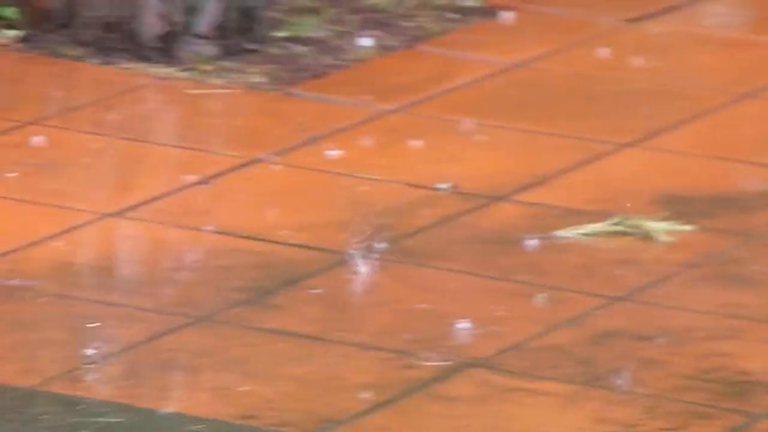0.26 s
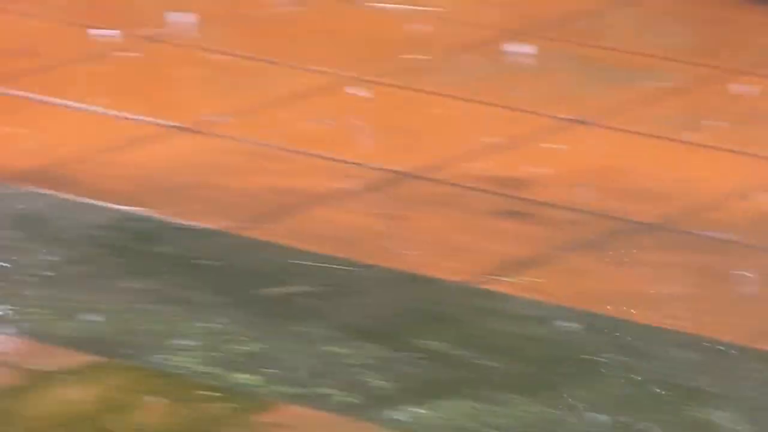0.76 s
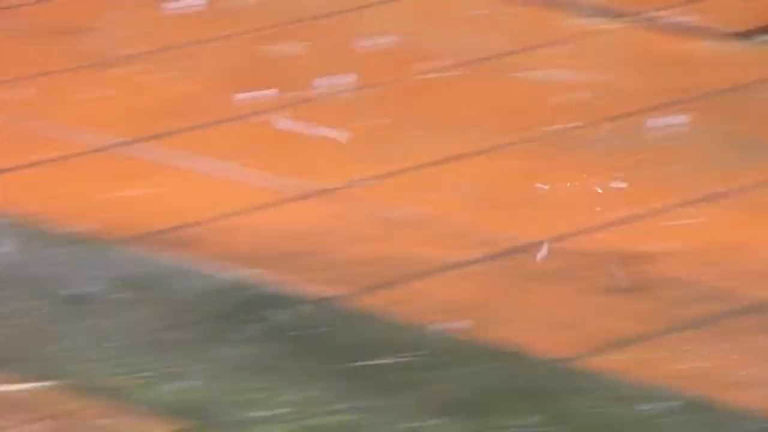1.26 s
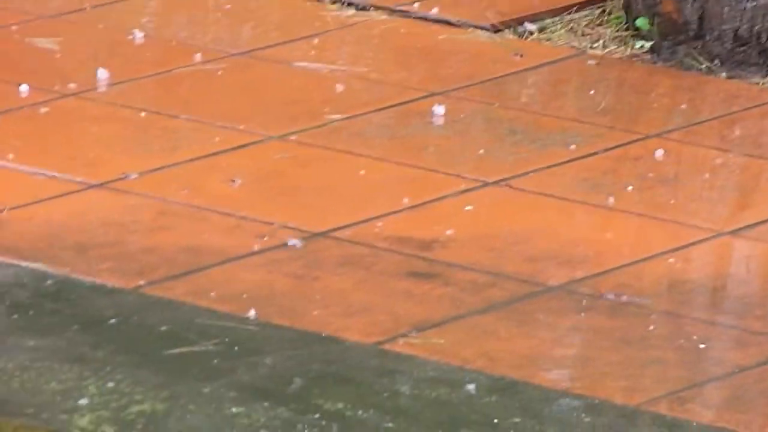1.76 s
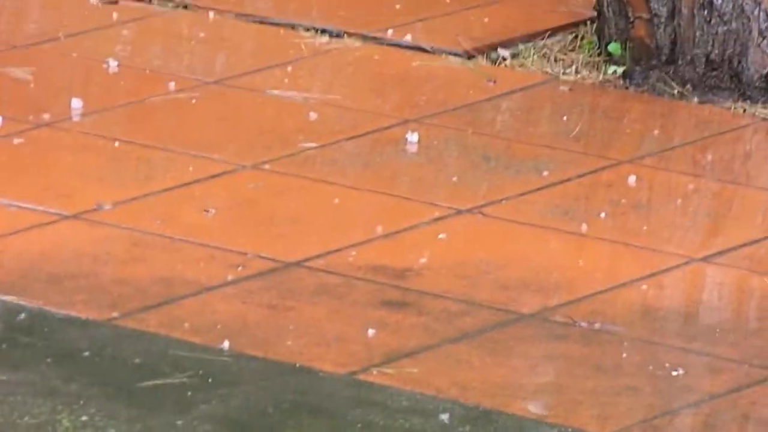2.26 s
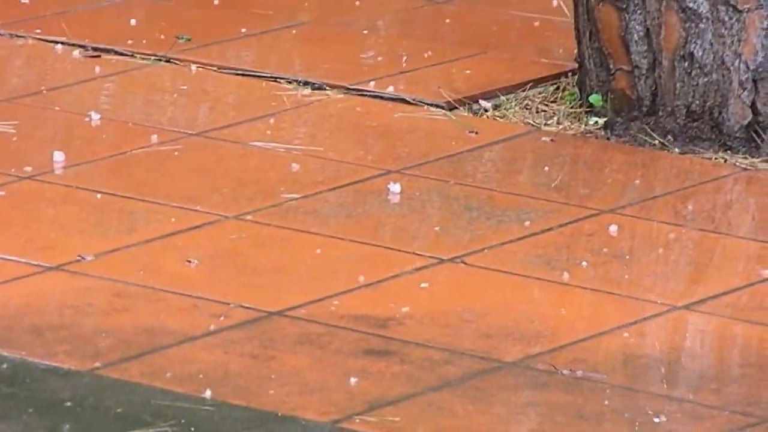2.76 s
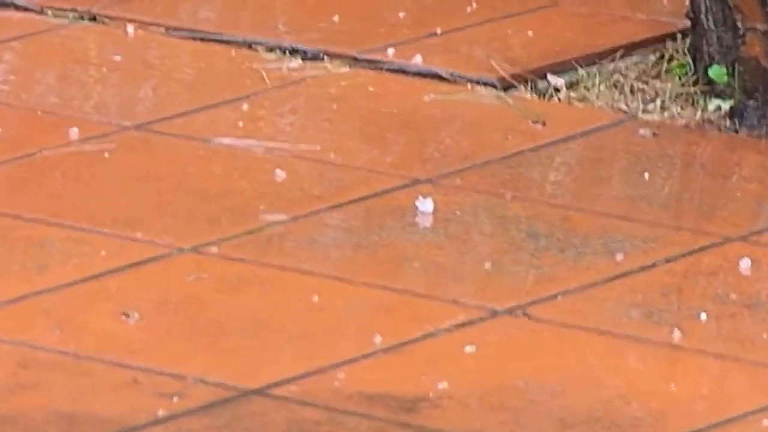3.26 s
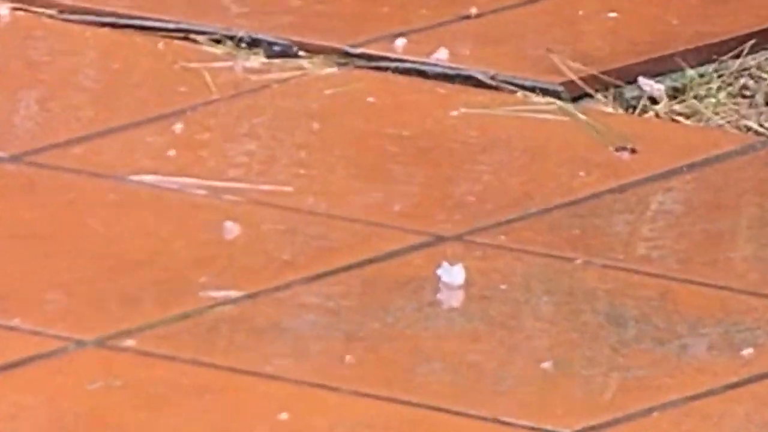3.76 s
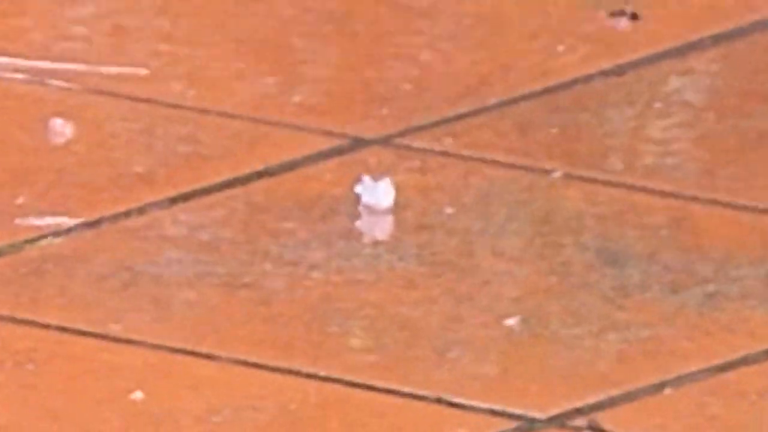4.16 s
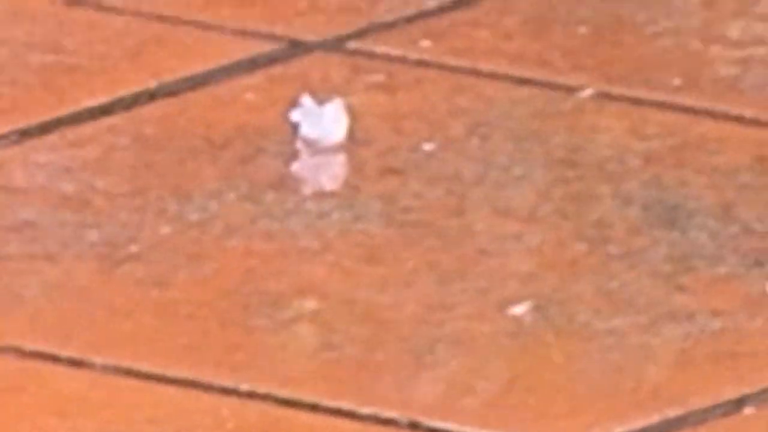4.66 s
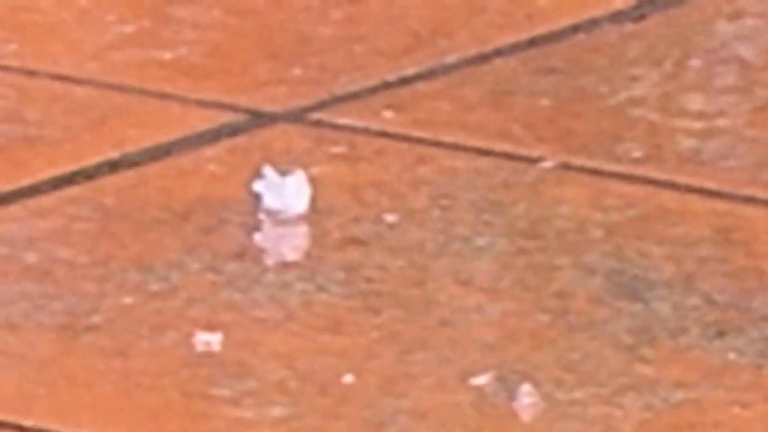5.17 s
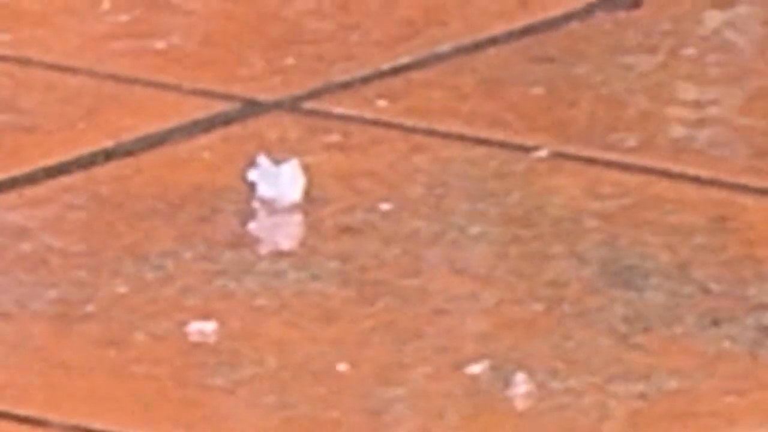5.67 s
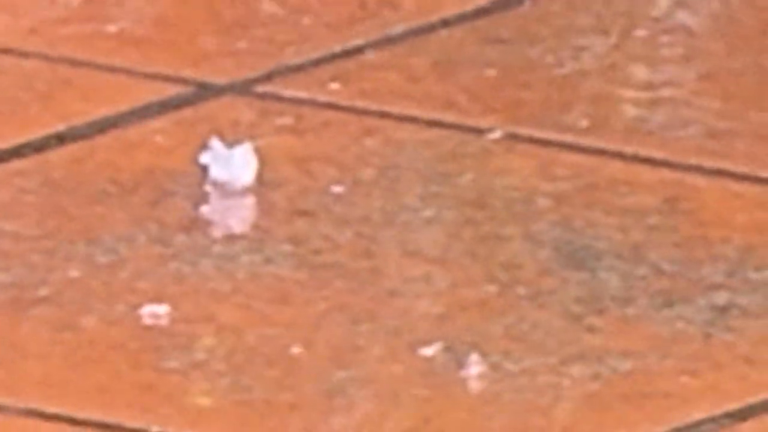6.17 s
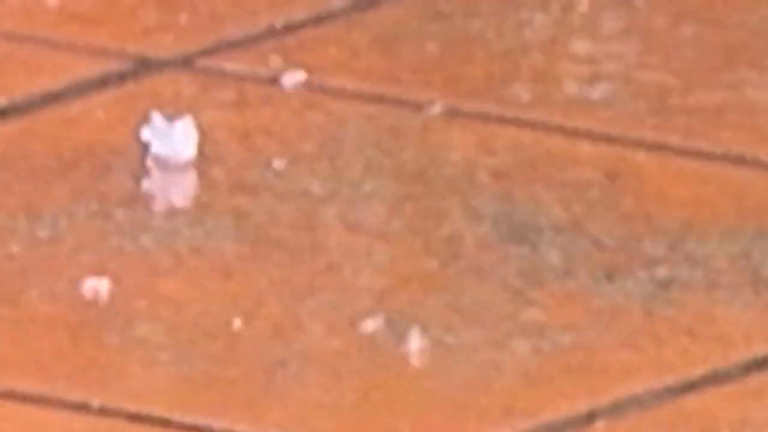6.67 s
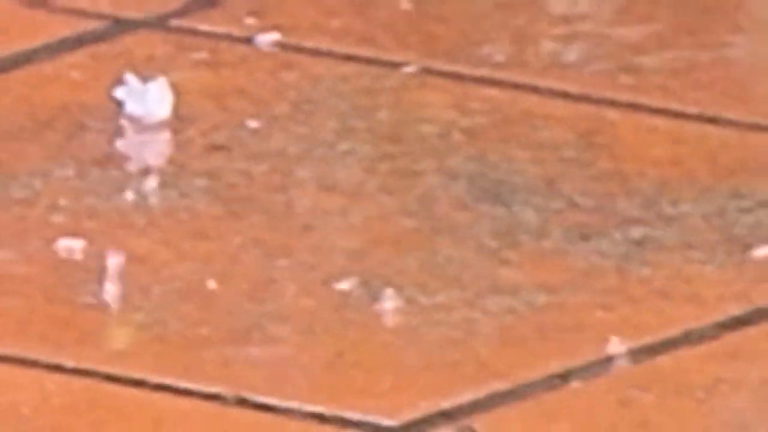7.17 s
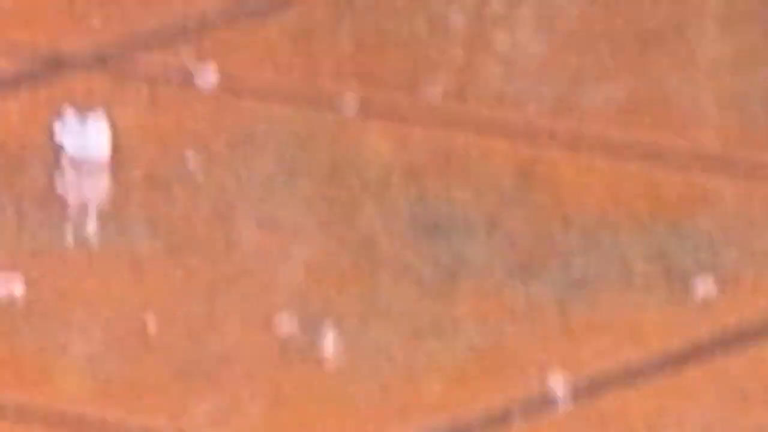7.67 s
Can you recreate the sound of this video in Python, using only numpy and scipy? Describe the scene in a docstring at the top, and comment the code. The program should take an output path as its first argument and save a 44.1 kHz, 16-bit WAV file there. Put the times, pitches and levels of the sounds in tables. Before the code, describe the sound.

Hail and rain fall on a wet tiled terrace, heard from under a porch. A steady wide hiss and faint low hum lie beneath dense fine patter. Irregular hard clicks and small splashes jump out left and right throughout, strongest around two seconds. Soft hollow knocks and a few tiny plops appear, with one short low wind buffet near 1.8 seconds. Close stereo microphones, crisp and bright.

```python
"""Hail and rain on a wet tiled terrace, heard by a camcorder with two close microphone ports under a porch.
Near stones crack and splash as short bursts of shaped noise; thousands of smaller drops patter the same way.
Far rain is banded hiss with the porch's low hum in it. Puddles plop as short sine rings, and something hollow
knocks now and then as noise through resonances. Filtered noise makes one gust on the ports and one brief
fizzy swell."""
import sys
import numpy as np
from scipy import signal
from scipy.fft import rfft, irfft
from scipy.io import wavfile
from scipy.ndimage import uniform_filter1d

SR = 44100
rng = np.random.default_rng(int(sys.argv[2]) if len(sys.argv) > 2 else 0)


def persist_wave(psi):
    """Save psi, clipped to +-1, as 16-bit WAV."""
    counts = np.round(np.clip(psi, -1, 1) * 32767).astype(np.int16)
    wavfile.write(sys.argv[1], SR, np.atleast_2d(counts).T)


N = 349272


def undb(db):
    """Decibels to an amplitude factor."""
    return 10 ** (np.asarray(db) / 20)


def curve(table):
    """Straight lines through (seconds, value) points, one value per sample."""
    s, value = np.transpose(table)
    return np.interp(np.arange(N) / SR, s, value)


def over_hz(table, hz):
    """Lines through (Hz, value) points on a logarithmic frequency axis."""
    point_hz, value = np.transpose(table)
    return np.interp(np.log(np.maximum(hz, 1)), np.log(point_hz), value)


def band(x, lo_hz, hi_hz):
    """Keep what lies between two frequencies, with gentle slopes outside."""
    return signal.sosfilt(signal.butter(2, [lo_hz, hi_hz], "band", fs=SR, output="sos"), x)


def walk(rate):
    """Random levels held 1 / rate s and smoothed twice; spread near 1."""
    hold = int(SR / rate)
    steps = np.repeat(rng.standard_normal(N // hold + 1), hold)
    return 1.78 * uniform_filter1d(uniform_filter1d(steps, hold), hold)[:N]


def add(out, at, shapes):
    """Mix one short shape per event into a track, starting at the given samples."""
    index = np.clip(at[:, None] + np.arange(shapes.shape[1]), 0, N - 1)
    out += np.bincount(index.ravel(), shapes.ravel(), N)


def swell(at_s, top_db, rise, hold_s, fall):
    """Gain that climbs to its top at at_s, holds and dies away; slopes in dB per second."""
    t = np.arange(N) / SR - at_s
    return undb(top_db + rise * np.minimum(t, 0) - fall * np.maximum(t - hold_s, 0))


def far_rain(pour_db):
    """Far drops blur to octave bands of hiss; from mid bands up it follows the downpour, each band flickers."""
    # Colour of the hiss and the porch's low hum. Each row: frequency in Hz, relative density in dB per Hz.
    rain_colour = [(18, -56.5), (30, -22), (95, -2), (137, 4), (256, -10), (399, 0), (518, -4), (945, -5.5),
                   (2180, -1.5), (4540, 0.5), (7080, 0), (7860, -4), (8950, 1), (15500, -5)]
    # How alike the two ports hear it. Each row: frequency in Hz, left-right correlation from -1 to 1.
    port_likeness = [(60, 0.85), (600, 0.93), (1400, 0.81), (3100, 0.35), (5000, 0.038), (8000, -0.48),
                     (15000, -0.21)]
    hz = np.fft.rfftfreq(N, 1 / SR)
    like = np.clip(over_hz(port_likeness, hz), -.99, .99)
    a, b = rfft(rng.standard_normal((2, N)))
    mid = a * np.sqrt(1 + like)
    side = b * np.sqrt(1 - like)
    pair = np.array([mid + side, mid - side]) * undb(over_hz(rain_colour, hz))
    grain_db = 1.19 * walk(400) + 0.31 * walk(60)  # distant drops never quite merge
    out = 0
    octave = np.log2(np.maximum(hz, 1) / 20)
    for k in range(11):  # octave windows centred on 20 Hz, 40 Hz and so on, overlapping to a sum of one
        window = np.cos(np.pi / 2 * np.clip(octave - k, -1, 1)) ** 2
        follow = np.clip((k - 3.5) / 1.8, 0, 1)
        flicker_db = 0.78 * walk(4.6) + 1.07 * walk(25)
        level_db = follow * (pour_db + grain_db) + flicker_db
        out = out + undb(level_db) * irfft(pair * window, N)
    return out * undb(-35) / np.std(out)


def gust():
    """A short buffet of wind on both ports: low noise with a rough edge, the same in each."""
    rumble = band(band(rng.standard_normal(N), 34, 90), 30, 200)
    rough_edge = undb(-13 + 3 * walk(60)) * band(rng.standard_normal(N), 110, 670)
    buffet = rumble + rough_edge
    gain = swell(at_s=1.76, top_db=-46.5, rise=237, hold_s=0.06, fall=117)
    return gain * buffet / np.std(buffet)


def fizzy_swell():
    """A brief fizzy swell in the low treble: flickering band noise, separate in each port."""
    fizz = band(rng.standard_normal((2, N)) * undb(2.1 * walk(150)), 2070, 2600)
    gain = swell(at_s=6.985, top_db=-43, rise=200, hold_s=0.05, fall=60)
    return gain * fizz / np.std(fizz)


def knocks():
    """Something hollow under the porch, struck softly: a fading rough push through its broad resonances."""
    # Soft hollow knocks. Each row: start in seconds, peak in dB ahead of the microphone's colouring.
    knock_list = [(0.718, -37), (1.29, -31), (1.33, -35), (1.488, -34), (1.727, -31.5), (1.759, -30.5),
                  (1.789, -35), (1.819, -39), (1.889, -36), (2.64, -31.5), (2.679, -36), (2.705, -38.5),
                  (2.905, -33.5), (4.205, -36), (5.161, -37), (5.63, -35), (6.429, -37), (6.833, -35)]
    # Resonances of the hollow thing. Each row: frequency in Hz, width in Hz, gain in dB.
    resonances = [(408, 56, 5.5), (660, 440, -3.5)]
    rise_s, decay_s = 0.00078, 0.016
    s, peak_db = np.transpose(knock_list)
    t = np.arange(4096) / SR
    push = rng.standard_normal((len(s), 4096)) * (1 - np.exp(-t / rise_s)) * np.exp(-t / decay_s)
    note = 0
    for hz, width_hz, gain_db in resonances:
        note = note + undb(gain_db) * signal.lfilter(*signal.iirpeak(hz, hz / width_hz, SR), push)
    note = note / np.abs(note).max(axis=1, keepdims=True)
    out = np.zeros(N)
    add(out, (s * SR).astype(int), note * undb(peak_db)[:, None])
    return out


def plops():
    """Drops plop into puddles: a trapped bubble rings for a few cycles."""
    # Puddle plops. Each row: start in seconds, peak in dB ahead of the microphone's colouring, pitch in Hz.
    plop_list = [(0.2003, -30.5, 1620), (0.2223, -30, 1960), (0.7273, -27, 2570), (1.3877, -28, 2300),
                 (2.761, -32.5, 1420), (6.956, -29, 2500), (7.5144, -30, 2460)]
    rise_s, decay_s = 0.00023, 0.0015
    s, peak_db, hz = np.transpose(plop_list)
    t = np.arange(1024) / SR
    ring = np.sin(2 * np.pi * hz[:, None] * t) * (1 - np.exp(-t / rise_s)) * np.exp(-t / decay_s)
    ring = ring / ring.max(axis=1, keepdims=True)
    out = np.zeros(N)
    add(out, (s * SR).astype(int), ring * undb(peak_db)[:, None])
    return out


def strikes(s, band_db, pan_db, splash_db, size=1024, lead=48):
    """Each strike is a sub-millisecond crack and a spray of droplets; the ports hear it a few samples apart."""
    # Thud, body, crack and snap of a strike. Each row: lower edge in Hz, upper edge in Hz.
    strike_bands = [(900, 1800), (1800, 3500), (3500, 7500), (7500, 15600)]
    crack_s, grit_level = 0.00041, 0.19
    splash_s, splash_at_s = 0.0076, 0.0022  # decay time; delay at which the spray passes its stated level
    thud_floor_hz, strike_top_hz = 1040.0, 15100
    t = (np.arange(size) - lead) / SR
    hz = np.fft.rfftfreq(size, 1 / SR)
    count = len(s)
    shared = rng.standard_normal((count, size))
    own = rng.standard_normal((count, 2, size))
    clump = np.repeat(rng.standard_normal((count, size // 16)), 16, axis=1)
    turn = rng.standard_normal((count, 1))

    droplets = undb(4.35 * clump)  # the spray lands in uneven clumps
    spray = undb(splash_db)[:, None] * droplets * np.exp(-(t - splash_at_s) / splash_s) * (t > 0)

    # band energies become one smooth spectrum that falls away under the thud and over the snap
    lo, hi = np.transpose(strike_bands)
    density_db = np.transpose(band_db) - 10 * np.log10((hi - lo) / (SR / 2))
    centres = np.log(np.sqrt(lo * hi))
    blend = np.array([np.interp(np.log(hz + 1), centres, row) for row in np.eye(len(strike_bands))])
    low_fall = hz ** 2 / (hz ** 2 + thud_floor_hz ** 2)
    high_fall = 1 / np.sqrt(1 + (hz / strike_top_hz) ** 4)
    colour = undb(density_db @ blend) * low_fall * high_fall
    colour = colour * np.exp(1j * (np.pi / 2 + 0.79 * turn))  # a push and a pull of air

    lag = np.clip(-.55 * pan_db, -5, 5)  # in samples: the nearer port hears it louder and first
    out = np.zeros((2, N))
    for port, side in enumerate((1, -1)):
        grit = (0.7 * shared + 0.66 * own[:, port]) * np.exp(-t / crack_s) * (t > 0)
        crack = (t == 0) + grit_level * grit  # one clean blow, roughened as the ice shatters
        crack /= np.sqrt(np.sum(crack ** 2, axis=1))[:, None]
        shape = irfft(rfft(crack + spray * own[:, port]) * colour, size)
        at = np.round(s * SR + side * lag / 2).astype(int) - lead
        add(out[port], at, shape * undb(side * pan_db / 2)[:, None])
    return out


def patter(pour_db):
    """Drops and small stones all over the tiles: many faint, few strong, each duller or brighter, in flurries."""
    drops_per_s, faintest_db, spread_db, range_db = 450, -30.5, 5.5, 15
    count = int(drops_per_s * N / SR)
    place, rank = rng.random((count, 2)).T
    tilt, pan = rng.standard_normal((count, 2)).T
    # the strongest drops stand at most range_db over faintest_db
    crack_db = faintest_db - spread_db * np.log(rank + np.exp(-range_db / spread_db))
    thud_db = crack_db - 18 - 1.7 * tilt
    body_db = crack_db - 9.5 - 5.56 * tilt
    snap_db = crack_db + 1.5 + 3.1 * tilt
    levels = [thud_db, body_db, crack_db, snap_db]
    drops = strikes(place * N / SR, levels, 3.1 * pan, np.full(count, -32.), size=256)
    flurry_db = 1.15 * walk(25)
    return undb(0.61 * pour_db + flurry_db) * drops


def hail():
    """The near stones, one by one; each thud grows with the body of its strike."""
    # The loudest hailstones, ahead of the microphone's colouring. Each row: strike time in seconds,
    # crack energy in dB, body in dB re crack, snap in dB re crack, left minus right in dB,
    # splash in dB re strike.
    stones = [(0.037, -11, -20, -10, 7, -37), (0.1149, -6.5, -6, 6, -1.5, -46),
              (0.1319, -3, -7, -0.5, -2, -28.5), (0.25, -3.5, -5, 2.5, 15, -44),
              (0.3122, -5, -15, 9, -3, -35), (0.3152, -16, -20, 2, 0, -28), (0.374, -8.5, -8, -3, 0.5, -22),
              (0.3813, 0.5, -6.5, 2, -7, -38), (0.4447, -9, -13, 7, -1, -37),
              (0.7155, -10, -15, 3, -10, -44), (0.7291, -9, -3.5, -7, 3, -28), (0.791, -2, -13, 3, -9, -36),
              (0.8174, -8, -7, -5, 4, -31), (0.9484, -4, -13, -12, 3.5, -44),
              (0.9656, -8.5, -19, 5, -1, -44), (1.0117, -8, -11, 1, 2, -27), (1.0405, -6, -10, 2, -5, -44),
              (1.0576, -4, -17, -1, -5, -42), (1.1158, -9, -12, 1, 3, -39),
              (1.1254, -10.5, -18, 8, -12, -39), (1.1709, -9, -10, 1, 7, -44), (1.2245, -9, -7, 1, -4, -29),
              (1.2686, -1, -0.5, -1, 1, -35), (1.2718, -12, -10, 5, 2, -33), (1.3047, -5, -19, 3, 1, -34),
              (1.3183, 5, -4.5, 0, 3.5, -41), (1.3238, -8, 0, 7, 3, -27), (1.328, -10, -1, 0, 2, -21),
              (1.3515, -2, -6, -1, 7, -34), (1.3684, -11, -19, 6, 8, -33), (1.374, -7, -19, 7, -5, -40),
              (1.3888, -11.5, 1, 8, 2, -35), (1.4048, -11, -15, 6, -6, -36),
              (1.428, -9, -24, 13.5, -1, -41), (1.5241, -6, -16, 1.5, 6.5, -28),
              (1.6095, 6, -20, -1, 4, -43), (1.6146, -6.5, -7, -6, 2.5, -26), (1.6786, -7, -4, -8, 2, -44),
              (1.73, -5.5, -11, 3, 3.5, -26), (1.7363, 1, -7.5, -7, -5.5, -25),
              (1.7406, -11, -1, 4, 7, -26), (1.856, -7, -20, 8, -7, -43), (1.873, -8, -16, 3, -3, -28),
              (1.8915, 9.5, -13.5, -9.5, 1.5, -42), (1.934, -2, -15, -3, 3, -44),
              (1.9483, -8, -18, 7, 10, -40), (1.9876, -0.5, -12, -7, 7, -44),
              (2.0109, -13, -15, 6, 0.5, -34), (2.059, 0, -11, -8, -2, -44),
              (2.0777, 9, -8.5, -9, -4, -31.5), (2.156, -10.5, -18, 4, -3, -24),
              (2.23, -5, -18, -5, 3.5, -34), (2.3727, -12.5, -9, 7, -8, -44),
              (2.3958, 3.5, -9, -4.5, -3, -35), (2.417, -4.5, -8, -5, 4, -25.5),
              (2.4262, -7, -15, -2, 4.5, -39), (2.51, 3, -10, -12, 9, -48), (2.6458, -5.5, -28, -6, 7, -31),
              (2.6724, -7.5, -8, -3, -1, -28), (2.6883, -10, -9, 3, 6, -29), (2.7115, -9, -3, 0, -1, -40),
              (2.9207, -6.5, 4, 6.5, -4, -35), (2.9756, -2, -13, -1.5, 0, -32),
              (2.9919, -5, -24, -3, -4, -25.5), (3.0032, -6.5, -2, 6, 2, -44),
              (3.0945, -3.5, 0, -1, 2, -34), (3.18, -12.5, -10, 7, 6, -30), (3.1902, -13, -9, 11, 4.5, -35),
              (3.251, -9, -16, 6, 4.5, -33), (3.2773, -7, -5, -5, 1, -30), (3.3693, -5.5, -9, 3, -3.5, -29),
              (3.4506, -12, -9, 0, -3, -34), (3.4564, -7, -4, 1, 3, -30.5), (3.795, -12, -7, 4, 7, -39),
              (3.8304, -11, -9, 11, 0, -39), (3.86, -11.5, -4, 0, 6, -25.5), (3.8664, -13, -13, 5, 5, -27),
              (3.9553, -2, -1, -7, 3, -29), (3.9603, -2, -14, 0, -5, -37), (4.0482, -1.5, -9, -3, 2, -44),
              (4.077, -1.5, -3.5, 0, 1.5, -38), (4.1339, -5.5, -10, 0, 8, -36),
              (4.1703, 2.5, -15, -8, -4, -30), (4.308, -9, -14, 5.5, 4, -31),
              (4.4999, -21, -15, 14, 13, -36), (4.5209, -0.5, -13, -8, 4, -44),
              (4.5845, 0, -11, -2.5, -8, -34), (4.592, -7.5, -14, 7, 4, -44),
              (4.605, -10, -15, 5, -0.5, -31), (4.636, -5, -3, 0, -6, -32), (4.6436, -4.5, -8, -3, -4, -30),
              (4.7078, -8, -2, 4, -2, -38), (4.732, -6.5, -4, 0.5, 2, -30),
              (4.762, -4.5, -11, 1, -1, -28.5), (4.8132, -7, -2, -5, 7, -31), (4.821, -4.5, 0, 1, -2, -48),
              (4.8731, -7, -17, 12, -3, -31), (4.9068, -7.5, -3, 2, -6, -36), (4.953, -13, -17, 8, -2, -29),
              (4.9614, -14, 6, 2, 0, -35), (4.969, -12, -13, 9, 0, -31), (4.9957, -16, -4.5, 6, 23, -31),
              (5.0478, -8, -12, 3.5, -12, -44), (5.0685, -6.5, -9, 1, 4.5, -34),
              (5.158, -11.5, -6, 1, 0.5, -40), (5.203, -9, -8, -11, 7, -34),
              (5.2353, -8, -5, -13, 2.5, -29), (5.3227, -10.5, -12, -2, -1, -25),
              (5.3648, -15, -22, 9, 1, -40), (5.3755, -0.5, -22, -8, -4.5, -29),
              (5.385, -17, 9, -5, 0, -30), (5.395, -3.5, -1.5, -4, -2, -29),
              (5.4467, 3.5, -13.5, -1, 1, -43), (5.5233, 0, -3.5, 3, 0, -33.5),
              (5.5324, -13, -3, 1, 1, -25), (5.672, -0.5, -17, 3, -4.5, -34), (5.695, -8.5, -5, 7, 1, -34),
              (5.7298, -10, -8, -1, 1, -23), (5.776, -11, -3.5, -7, 0, -22),
              (5.783, -1.5, -12, -8, -4.5, -35), (5.8546, -7, -14, -2, -1, -33),
              (5.913, -4.5, -4, -7, 7, -41), (5.9423, -2, -12.5, -5, 7.5, -42),
              (5.9918, -10, -14, 8, 3, -35), (5.9962, -12, -14, 7, 3.5, -30), (6.055, -4.5, -6, 0, -4, -27),
              (6.1575, -8, -3, -2, 6, -32), (6.1859, -7.5, -12, 7, 0.5, -37),
              (6.2256, -12, -13, 6, -9, -28), (6.3946, -2.5, -3.5, 0, 3, -32),
              (6.45, -8, -11, -1, -10, -44), (6.4731, -2, -4, -9, 2, -41), (6.5631, -7, -9, 1, -1.5, -41),
              (6.5776, -5.5, -12, 2, -2, -29), (6.765, -9, -18, 1.5, -1, -30),
              (6.8052, -9, -15, 8, -6, -28), (6.869, -10.5, -8, 11, -6.5, -33),
              (6.8825, -6, -6, 0, 6.5, -42), (6.9302, -10, -11, 2, 3, -32), (6.9407, -10.5, -26, 3, 1, -37),
              (7.023, -6, -13, 4, -3.5, -44), (7.044, -10, -1, 3, 2, -34), (7.13, -10.5, -18, 6, -1, -40),
              (7.152, -3.5, -12, -23, 2.5, -44), (7.177, -10.5, -7, 2, 5, -30),
              (7.2569, -1, -16, -8, 11.5, -31), (7.2782, -4.5, -19, -3, 11, -44),
              (7.3098, -6, -8, -5, 8, -34), (7.4042, -14, -14, 11, -6, -38), (7.4707, -13, 0, -6, 5, -37),
              (7.477, -8, -3, 3, -1, -39), (7.607, -7.5, -2, -2, 2, -33), (7.6741, -6.5, 1, 3, 3.5, -42),
              (7.6945, -7, -4, 0, 1.5, -44), (7.7088, -24, -9, 24, 5, -44), (7.79, -16.5, 0, 12, 8.5, -44),
              (7.8495, -1.5, -8, -7, -2, -28), (7.8634, -2.5, -6, -3, 0, -34),
              (7.8955, -6.5, -11, -6, 5.5, -26), (7.9, -8.5, -12, -1, -1, -34)]
    s, crack_db, body_db, snap_db, pan_db, splash_db = np.transpose(stones)
    thud_db = -12 + body_db  # re crack
    levels = [crack_db + thud_db, crack_db + body_db, crack_db, crack_db + snap_db]
    return strikes(s, levels, pan_db, splash_db)


def scene():
    """All layers under the porch; far rain and patter share the rise and fall of one downpour."""
    # The downpour, of which only the swing about its mean is used. Each row: time in seconds, level in dB.
    downpour = [(0.0, -36), (0.24, -33), (0.68, -34.5), (1.15, -32.5), (1.96, -32.5), (2.07, -34.5),
                (3.7, -35.5), (4.01, -33), (4.28, -35), (4.48, -36), (4.85, -33), (5.14, -35),
                (5.51, -33.5), (6.07, -33.5), (6.26, -35.5), (7.21, -33.5), (7.52, -33), (7.92, -32.5)]
    pour = curve(downpour)
    pour_db = pour - np.mean(pour)
    background = far_rain(pour_db) + gust() + fizzy_swell()
    return background + knocks() + plops() + patter(pour_db) + hail()


def record(dry):
    """The camcorder: left port stronger, most in the bass, a narrow dip near 8 kHz, hard clipping, a top cut."""
    # Imbalance of the two ports. Each row: frequency in Hz, left minus right in dB.
    left_lean = [(60, 4), (600, 5.5), (2000, 1), (4000, 1.6), (12000, .5)]
    roll_hz, top_hz = 15600, 16450
    notch_hz, notch_width_hz, notch_depth = 7867, 480, .78
    hz = np.fft.rfftfreq(N, 1 / SR)
    lean_db = over_hz(left_lean, hz) / 2
    step_db = -12 * np.clip((hz - roll_hz) / 250, 0, 1)  # the last stretch under the cut is weaker
    x = irfft(rfft(dry) * undb([step_db + lean_db, step_db - lean_db]), N)
    x = x - notch_depth * signal.lfilter(*signal.iirpeak(notch_hz, notch_hz / notch_width_hz, SR), x)
    top_cut = signal.ellip(10, .2, 70, top_hz, fs=SR, output="sos")
    return signal.sosfilt(top_cut, np.clip(x, -1, 1))


dry = scene()
out = record(dry)
persist_wave(out)
```